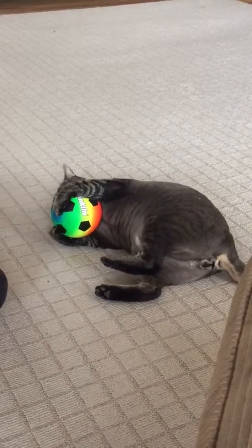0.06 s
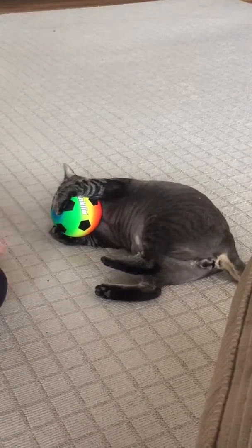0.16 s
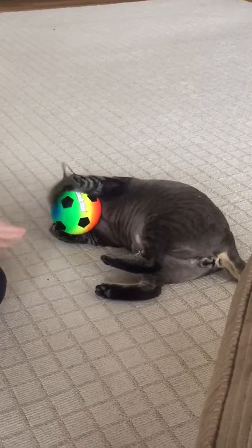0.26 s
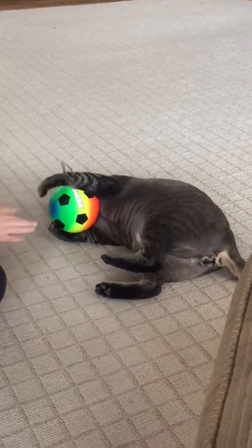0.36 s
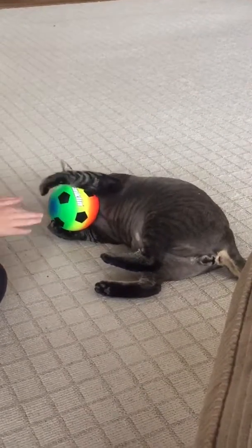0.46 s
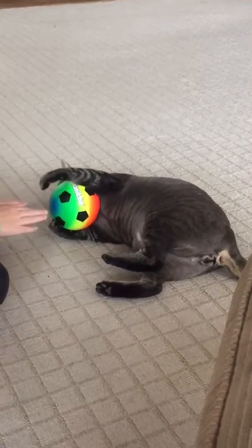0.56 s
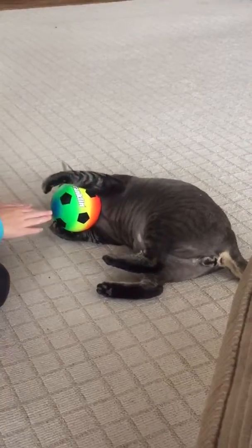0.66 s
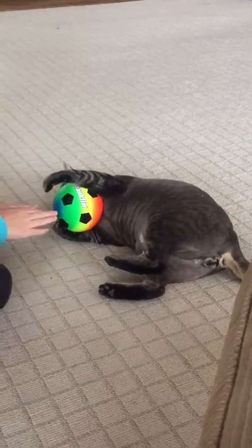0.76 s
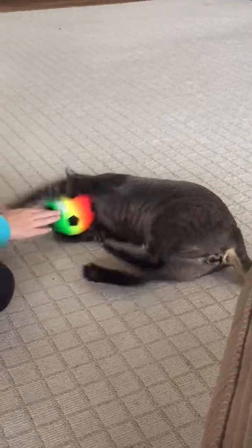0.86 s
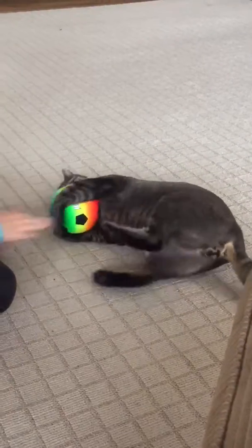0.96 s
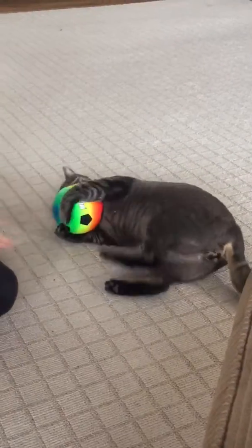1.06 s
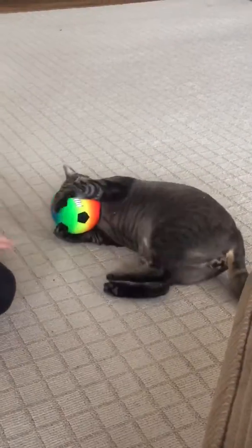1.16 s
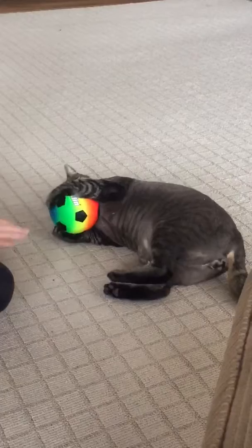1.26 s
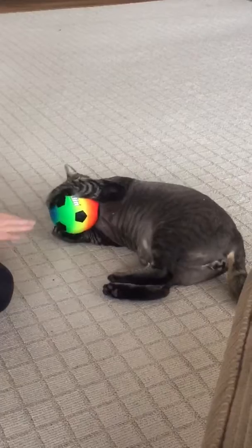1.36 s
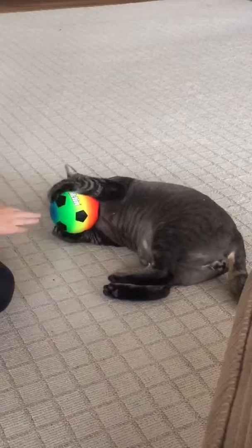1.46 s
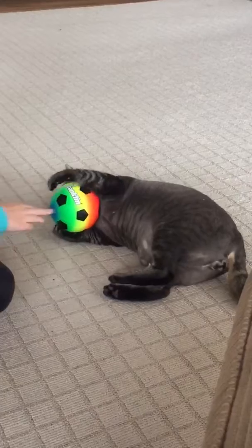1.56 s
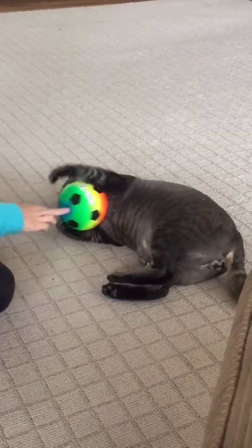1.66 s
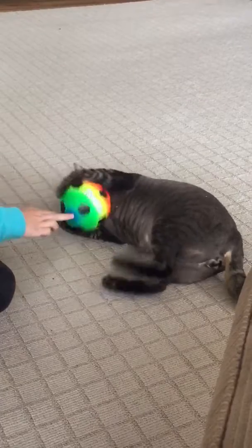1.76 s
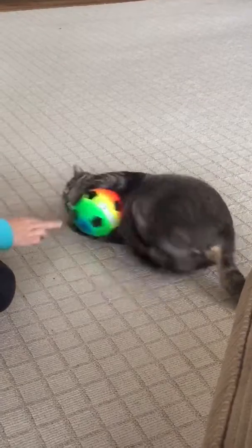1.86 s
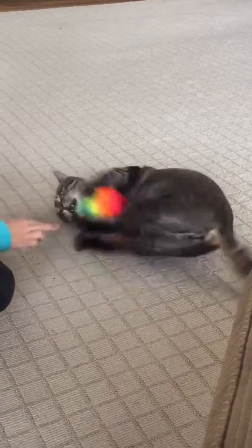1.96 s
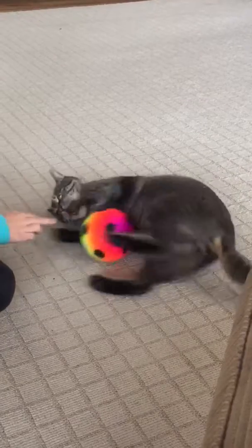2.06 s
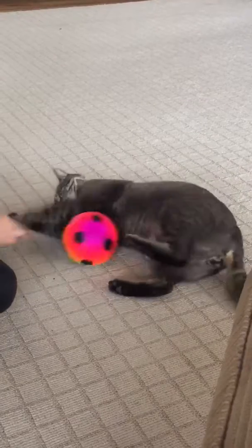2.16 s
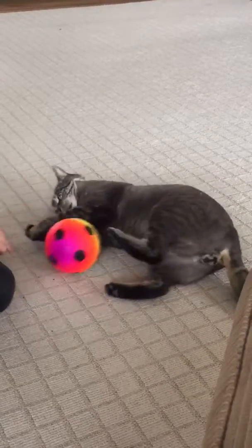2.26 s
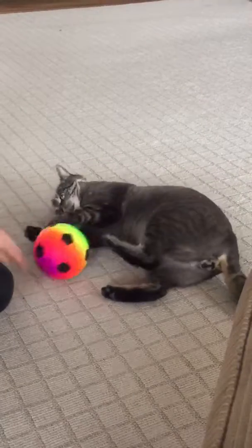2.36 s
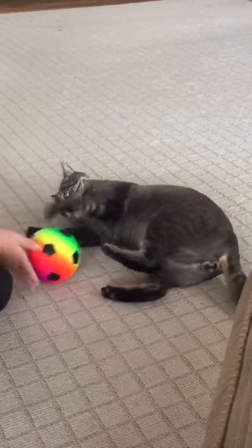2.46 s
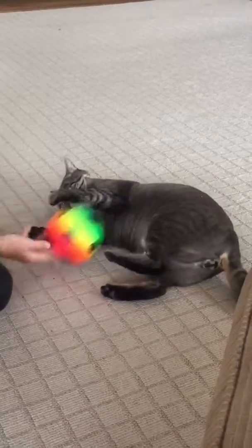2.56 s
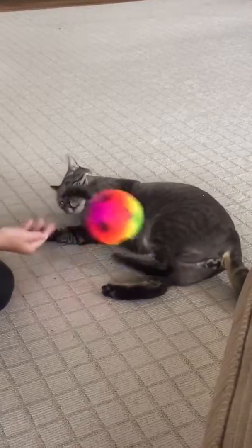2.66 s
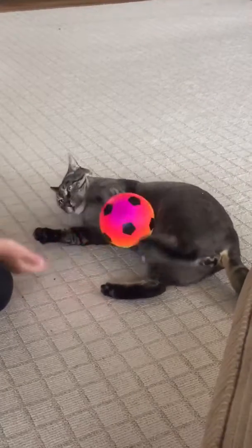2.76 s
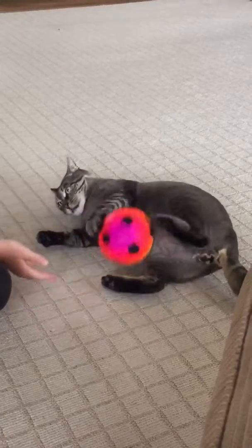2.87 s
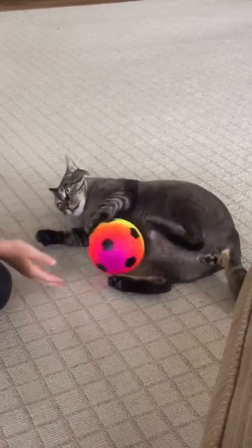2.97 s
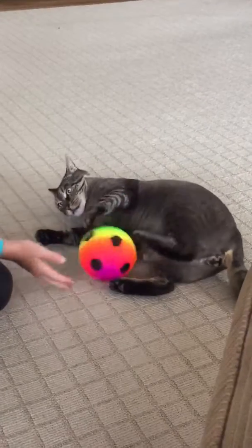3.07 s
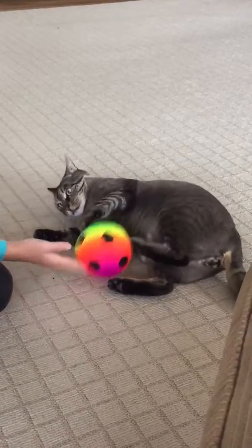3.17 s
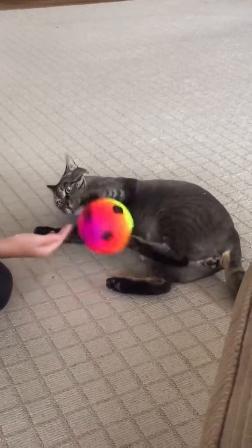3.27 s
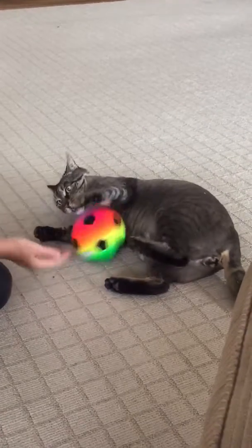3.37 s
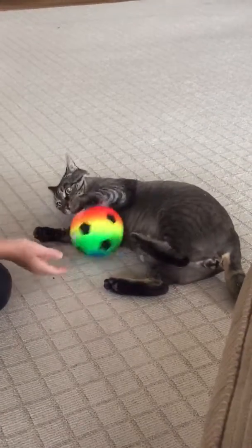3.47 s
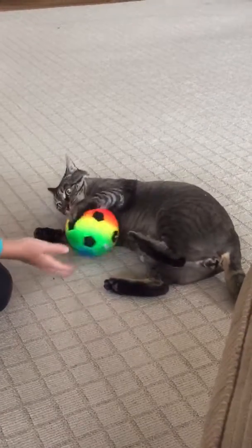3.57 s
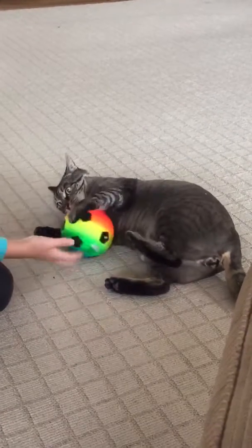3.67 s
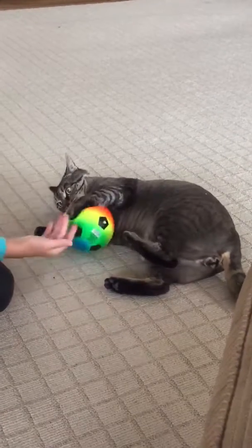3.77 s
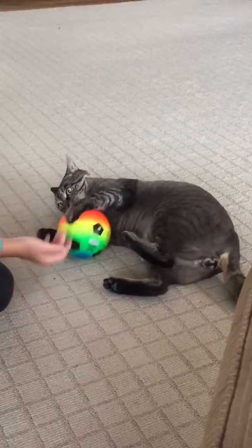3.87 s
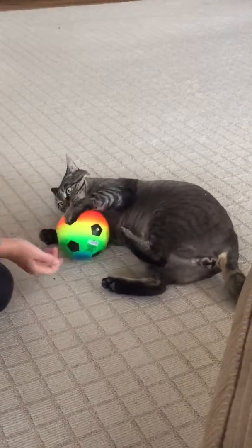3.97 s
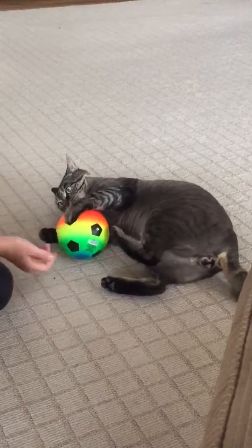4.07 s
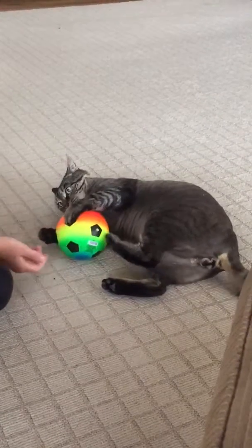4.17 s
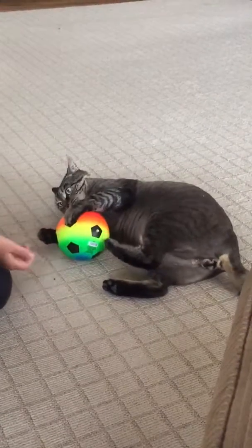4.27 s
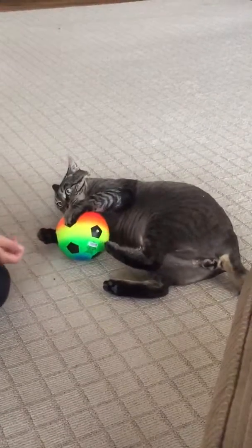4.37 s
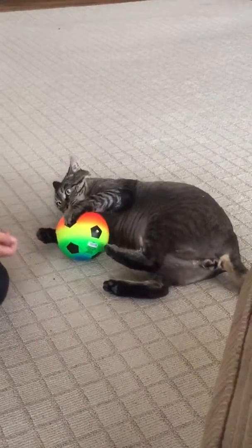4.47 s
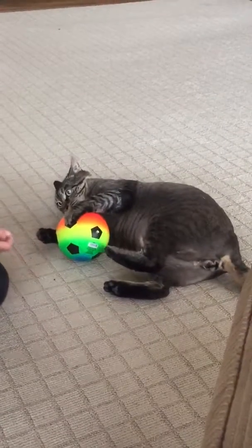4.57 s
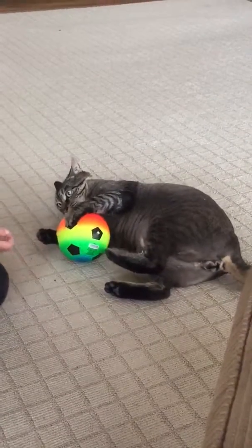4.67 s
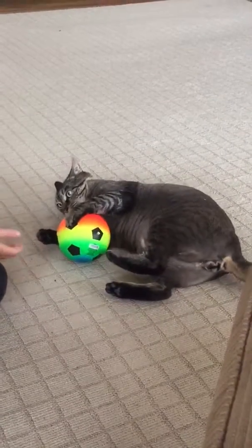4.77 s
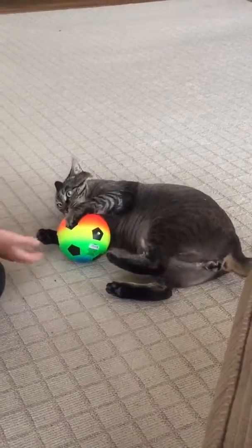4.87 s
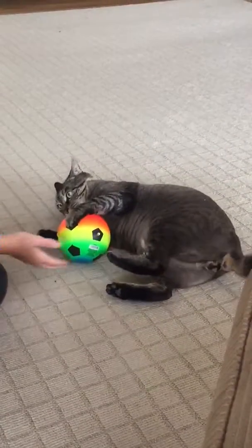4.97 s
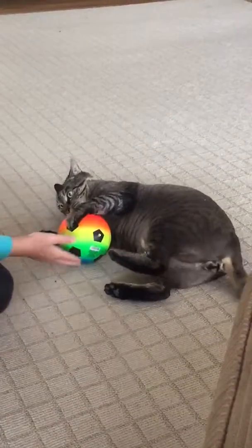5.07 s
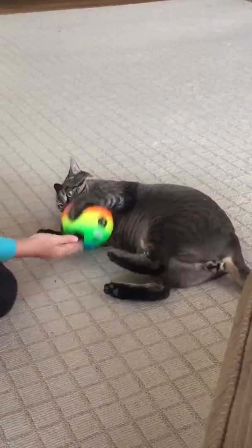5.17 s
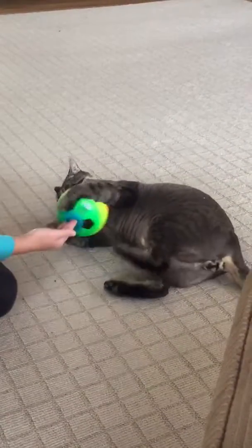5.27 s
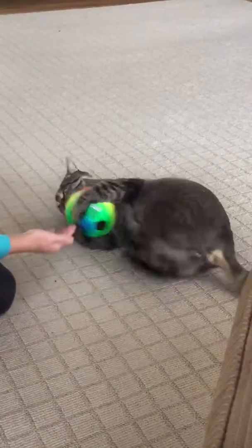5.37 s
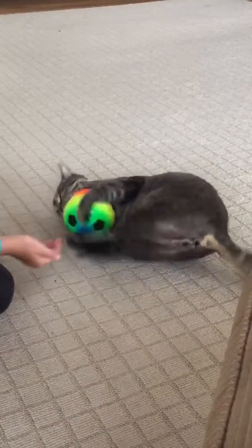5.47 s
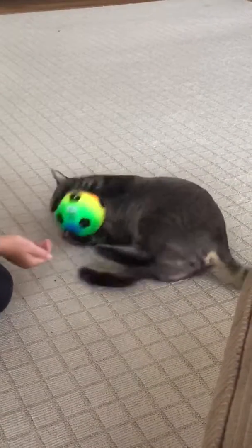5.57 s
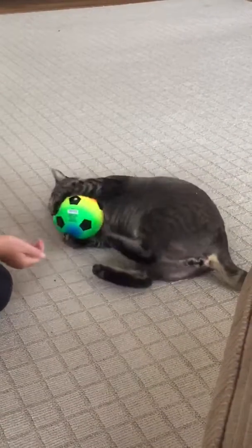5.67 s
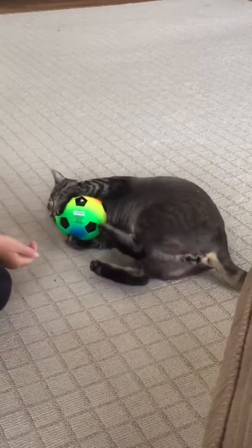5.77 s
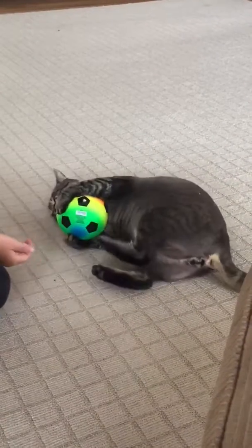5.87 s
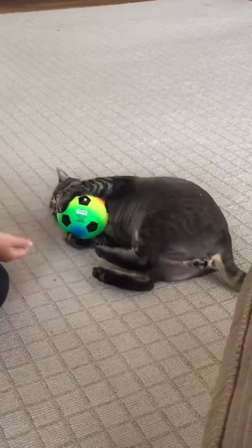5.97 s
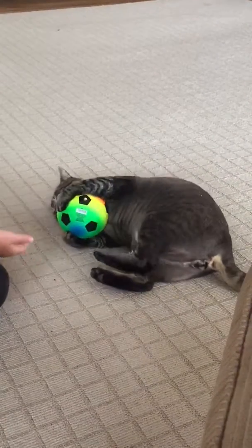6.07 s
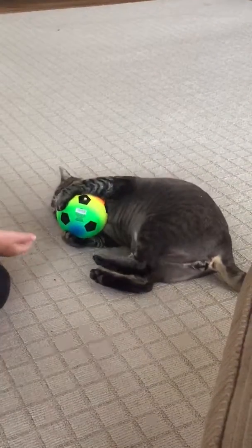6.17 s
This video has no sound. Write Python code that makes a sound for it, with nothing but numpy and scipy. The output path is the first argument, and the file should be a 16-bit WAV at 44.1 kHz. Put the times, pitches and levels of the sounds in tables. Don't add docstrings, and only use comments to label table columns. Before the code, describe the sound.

In a quiet carpeted living room, a cat growls low and rattling, its pitch climbing, then breaks into a short hoarse snarl. After a pause comes a double snarl with hollow ball thumps and scuffs, then a low snarl leading into a long yowl that rises, sags and dies. A last short snarl comes with more thumps. The microphone is a little way off, with slight room echo and faint low hum.

```python
import sys
import numpy as np
from scipy import signal
from scipy.fft import rfft, irfft, next_fast_len
from scipy.io import wavfile
from scipy.ndimage import uniform_filter1d

SR = 44100
rng = np.random.default_rng(int(sys.argv[2]) if len(sys.argv) > 2 else 0)


def persist_wave(psi):
    counts = np.round(np.clip(psi, -1, 1) * 32767).astype(np.int16)
    wavfile.write(sys.argv[1], SR, np.atleast_2d(counts).T)


def ratio_of_db(decibels):
    return 10 ** (np.asarray(decibels, float) / 20)


N = 274302
TIME = np.arange(N) / SR


def rms_one(x):
    return x / np.sqrt(np.mean(x ** 2) + 1e-20)


def evened(x):
    return x / np.sqrt(uniform_filter1d(x ** 2, size=1800) + 1e-12)


def drift(rate_hz):
    r = np.exp(-2 * np.pi * rate_hz / SR)
    wander = signal.lfilter([1], [1, -2 * r, r * r], rng.standard_normal(N + SR))
    return rms_one(wander[SR:])


def coloured(spectrum):
    hz, level_db = np.transpose(spectrum)
    size = next_fast_len(N)
    bins_hz = np.arange(size // 2 + 1) * SR / size + 1
    gain = ratio_of_db(np.interp(np.log(bins_hz), np.log(hz), level_db))
    return rms_one(irfft(rfft(rng.standard_normal(size)) * gain, size)[:N])


def butter(x, hz, kind, order):
    return signal.sosfilt(signal.butter(order, hz, kind, fs=SR, output="sos"), x)


def resonance(x, hz, width_hz):
    r = np.exp(-np.pi * width_hz / SR)
    poles = [1, -2 * r * np.cos(2 * np.pi * hz / SR), r * r]
    return signal.lfilter([(1 - r * r) / 2, 0, (r * r - 1) / 2], poles, x)


def twice_resonant(x, hz, width_hz):
    return resonance(resonance(x, hz, width_hz), hz, width_hz)


def ring(db, hz, t60_s):
    age = TIME[:SR // 5]
    landing = 1 - np.exp(-age / 0.00054)
    return ratio_of_db(db - 60 * age / t60_s) * np.sin(2 * np.pi * hz * age) * landing


def add(out, at_s, sound):
    i = round(at_s * SR)
    out[i:i + len(sound)] += sound


def swells(rows):
    return sum(ratio_of_db(db) * np.exp(-(2.6 * (TIME - s) / length_s) ** 4) for s, db, length_s in rows)


def played(tables):
    s, *columns = np.transpose(sorted(row for table in tables for row in table))
    return [np.interp(TIME, s, column) for column in columns]


def sounding(tables, fade_s):
    gate = 0
    for table in tables:
        start_s, end_s = table[0][0], table[-1][0]
        since_start = TIME - start_s + (start_s == 0)
        gate = gate + np.clip(np.minimum(since_start, end_s - TIME) / fade_s, 0, 1)
    return gate


def house():
    # (frequency [Hz], density [dB/Hz])
    hum_colour = [(12, -90), (20, -59), (49, -9.5), (106, -3), (129, -3.5), (149, -9.5), (196, -10.5),
                  (343, -21), (428, -26), (466, -23.5), (688, -30.5), (748, -40.5), (1020, -37.5),
                  (3010, -41.5), (15600, -51)]
    # (frequency [Hz], width [Hz], level [dB])
    drone_bands = [(68.5, 8.3, -60.5), (117.1, 7.6, -59.5)]
    out = ratio_of_db(-57) * coloured(hum_colour)
    for hz, width_hz, db in drone_bands:
        drone = rms_one(resonance(rng.standard_normal(N), hz, width_hz))
        out = out + ratio_of_db(db + 3.06 * drift(4.6)) * drone
    return out


def room(x):
    t60_s, wall_cut_hz = 0.63, 6400
    size = next_fast_len(N + SR)
    turn = np.exp(-2j * np.pi * np.arange(size // 2 + 1) / size)
    dull = np.exp(-2 * np.pi * wall_cut_hz / SR)
    lags = np.geomspace(.011, .043, 10) * rng.uniform(0.92, 1.05, 10) * SR
    tail = 0
    for k, lag in enumerate(lags):
        loss = ratio_of_db(-60 * lag / SR / t60_s)
        loop = loss * (1 - dull) / (1 - dull * turn) * turn ** int(lag)
        tail = tail + (-1) ** k * loop / (1 - loop)
    return irfft(rfft(x, size) * tail, size)[:N]


def scuffs():
    # (frequency [Hz], density [dB/Hz])
    carpet_colour = [(1470, -19), (2500, -9.5), (3810, -16), (5420, -13.5), (6460, -17), (7700, -23.5),
                     (8640, -21.5), (10600, -27), (13500, -18.5), (15600, -27)]
    # (middle [s], level [dB], length [s])
    scuff_rows = [(0.45, -85.5, 0.22), (1.2, -77.5, 0.14), (2.01, -74, .24), (2.0, -64, 0.057),
                  (2.05, -83, .05), (2.33, -80, .27), (2.64, -81.5, .06), (2.96, -79, .08),
                  (3.245, -78, 0.084), (4.43, -84.5, 0.35), (5.04, -84, 0.14), (5.543, -64.5, .055),
                  (5.8, -84.5, .15)]
    # (middle [s], level [dB], length [s])
    rumble_rows = [
        (1.2, -57, 0.17),
        (2.05, -41, 0.27),
        (2.3, -58, .2),
        (3.02, -54, 0.18),
        (4.55, -54, 0.3),
        (5.62, -48, 0.19),
    ]
    hiss = coloured(carpet_colour) * ratio_of_db(3.05 * drift(60) + 5.5)
    rumble = rms_one(resonance(rng.standard_normal(N), 91, 37)) * ratio_of_db(-7.5)
    return swells(scuff_rows) * hiss + swells(rumble_rows) * rumble


def noise_swells():
    # (middle [s], level [dB], frequency [Hz], width [Hz], length [s])
    noise_rows = [(1.872, -69, 2200, 1560, 0.011), (1.907, -52, 275, 110, 0.098),
                  (2.961, -51, 315, 250, 0.16), (5.533, -49, 525, 240, 0.035),
                  (5.53, -54.5, 2700, 410, 0.053), (2.175, -68.5, 5650, 480, 0.04),
                  (2.352, -60, 2230, 570, 0.02), (2.352, -65.5, 747, 216, .03),
                  (2.638, -72.5, 2060, 980, 0.037), (2.968, -76, 9370, 500, 0.049),
                  (5.218, -69, 1600, 1400, 0.035), (1.99, -62, 13100, 1500, .05),
                  (1.996, -64, 7470, 440, 0.063)]
    out = np.zeros(N)
    age = TIME[:SR // 5] - .1
    for s, db, hz, width_hz, length_s in noise_rows:
        noise = rms_one(twice_resonant(rng.standard_normal(len(age)), hz, width_hz))
        add(out, s + age[0], ratio_of_db(db) * noise * np.exp(-(2.7 * age / length_s) ** 2))
    return out


def blows():
    # (time [s], peak [dB], ball ring [Hz])
    thump_rows = [(1.087, -44.5, 543), (1.869, -41, 370), (2.001, -29, 435.2), (2.044, -32, 429),
                  (2.059, -35.5, 402), (2.094, -27, 435), (2.631, -45, 423), (2.735, -51, 510),
                  (2.868, -45.5, 430), (3.272, -40.5, 424), (3.513, -38.5, 415), (4.469, -44.5, 366),
                  (5.522, -32, 348.7), (5.554, -29.5, 360), (5.588, -40, 380), (5.6, -36, 432)]
    # (time [s], peak [dB], frequency [Hz], t60 [s])
    knee_rows = [
        (5.208, -37, 141, 0.046),
    ]
    out = np.zeros(N)
    for s, db, hz in thump_rows:
        air = ring(db + 2.5, hz, 0.038)
        overtone = ring(db - 18.5, 1.606 * hz, 0.045)
        floor = ring(db - 16, 90, 0.13)
        add(out, s, air + overtone + floor)
    for s, db, hz, t60_s in knee_rows:
        add(out, s, ring(db, hz, t60_s))
    return out


def folds(pitch_hz, rough):
    wobble = .012 * drift(25) + .09 * rough * drift(70)
    cycles = np.cumsum(pitch_hz * (1 + wobble)) / SR
    harmonics = np.floor(7000 / pitch_hz)
    pulse = np.sin((2 * harmonics + 1) * np.pi * cycles) / np.sin(np.pi * cycles)
    puffs = (1 - pulse) / np.sqrt(2 * harmonics)
    cycle_number = np.round(cycles).astype(int)
    strength = ratio_of_db(5 * rough * rng.standard_normal(N)[cycle_number])
    breath = rng.standard_normal(N) * (1 + np.cos(2 * np.pi * cycles)) * 1.4
    return (puffs * np.sqrt(1 - rough ** 2) + rough * breath) * strength


def throat(x, modes):
    out = 0
    for k, (hz, width_hz, db) in enumerate(modes):
        out = out + (-1) ** k * ratio_of_db(db) * twice_resonant(x, hz, 1.4 * width_hz)
    return evened(out)


def mouth(x, hz, width_hz, size=128):
    r = np.exp(-np.pi * 1.55 * np.broadcast_to(width_hz, N) / SR)
    y = np.zeros(N)
    state = np.zeros(4)
    for i in range(0, N, size):
        poles = [1, -2 * r[i] * np.cos(2 * np.pi * hz[i] / SR), r[i] ** 2]
        y[i:i + size], state = signal.lfilter([1, 0, -1], np.convolve(poles, poles), x[i:i + size], zi=state)
    return evened(y)


def growl():
    # (time [s], pitch [Hz], throat level [dB])
    growl_path = [
        (0.0, 114.3, -64),
        (0.2, 115.9, -66),
        (0.38, 117.8, -60.5),
        (0.47, 139.6, -56.5),
        (0.6, 168.5, -56),
        (0.69, 183, -57),
        (0.8, 177.7, -55),
        (0.9, 174.9, -57),
        (0.94, 174.6, -50),
    ]
    # (frequency [Hz], width [Hz], level [dB])
    shut_throat = [(355, 125, 0.1), (715, 120, -4)]
    pitch_hz, throat_db = played([growl_path])
    slack_tight_hz = [150, 180]
    rough = np.interp(pitch_hz, slack_tight_hz, [.62, .44])
    chest_db = np.interp(pitch_hz, slack_tight_hz, [5, 1])
    source = folds(pitch_hz, rough)
    chest = ratio_of_db(chest_db) * mouth(source, pitch_hz, 75)
    leak = ratio_of_db(-24) * throat(source, [(1240, 200, 0)])
    voice = throat(source, shut_throat) + chest + leak
    return ratio_of_db(throat_db) * sounding([growl_path], 0.0091) * voice


def cries(calls, mouths, roughs, widths_hz, gape_lift, strained):
    # (frequency [Hz], width [Hz], level [dB])
    open_throat = [(694, 108, 0.1)]
    first_width_hz, second_width_hz, teeth_widths_hz = widths_hz
    tables = []
    for call, shape, rough, teeth_width_hz in zip(calls, mouths, roughs, teeth_widths_hz):
        tables.append([(*row, *shape, rough, teeth_width_hz) for row in call])
    (pitch_hz, throat_db, jaw, lips, first_hz, second_hz, teeth_hz, teeth_db,
     lift, rough, teeth_width_hz) = played(tables)

    lips_rise = lift * lips
    gape_rise = gape_lift * np.clip(jaw - .64, 0, 1)
    if strained:
        rough = rough + .75 * np.clip(jaw - .7, 0, 1) + .0022 * np.clip(350 - pitch_hz, 0, None)
        teeth_db = teeth_db + 14 * jaw
        teeth_rise = 0.19 * gape_rise
    else:
        teeth_db = teeth_db + 21.5 * lips
        teeth_rise = 0.67 * lips_rise + 0.19 * gape_rise
    first_db = -30 + 40 * jaw
    second_db = first_db - 25.5 + 35 * lips

    source = folds(pitch_hz, rough)
    muffled = butter(source, 2700, "low", order=6)
    chest = ratio_of_db(-3) * mouth(muffled, pitch_hz, 78)
    low = evened(throat(muffled, open_throat) + chest)
    first = mouth(muffled, first_hz * (1 + lips_rise), first_width_hz)
    first = ratio_of_db(first_db + 2.5 * drift(9.8)) * first
    second = mouth(muffled, second_hz * (1 + 0.26 * lips_rise + gape_rise), second_width_hz)
    second = ratio_of_db(second_db + 2.5 * drift(10.7)) * second
    sharp = butter(source, 2300, "high", order=4)
    teeth = ratio_of_db(first_db + teeth_db) * mouth(sharp, teeth_hz * (1 + teeth_rise), teeth_width_hz)
    return ratio_of_db(throat_db) * sounding(calls, 0.028) * (low - first + second + teeth)


def yowl():
    # (time [s], pitch [Hz], throat level [dB], jaw opening [0-1], lips drawn back [0-1])
    yowl_path = [
        (3.04, 267.9, -62.5, .12, 1),
        (3.335, 335, -51.5, .12, .65),
        (3.385, 363, -47, .72, .25),
        (3.47, 409, -54, .97, .5),
        (3.67, 404, -52, .76, .38),
        (3.85, 395.7, -55, .52, .85),
        (4.13, 374, -45.5, 0.39, 0.52),
        (4.29, 328.3, -52, 0.38, 0.48),
        (4.53, 200, -69, 0.22, .6),
    ]
    # (first cavity [Hz], second cavity [Hz], teeth ring [Hz], teeth level [dB], cavity rise by lips [0-1])
    yowl_mouth = (1090, 1871, 5228, -35.5, 0.35)
    # (first cavity width [Hz], second cavity width [Hz], teeth ring width per call [Hz])
    yowl_widths_hz = (300, 235, [270])
    return cries([yowl_path], [yowl_mouth], [.13], yowl_widths_hz, gape_lift=.9, strained=True)


def snarls():
    # (time [s], pitch [Hz], throat level [dB], jaw opening [0-1], lips drawn back [0-1])
    snarl_paths = [
        [(0.92, 361.7, -61, .05, .3), (0.945, 359.3, -45, 0.23, 0.23), (0.97, 349.9, -47, .84, 0.17),
         (1.03, 408, -48, .66, .6), (1.1, 401.3, -63, .88, .65), (1.145, 408, -67, 1.0, .5)],
        [(1.85, 323, -58, .12, 0.5), (1.898, 347.5, -48.5, .2, 0.64), (1.915, 336.8, -49.5, .68, .62),
         (1.96, 349.1, -42, .55, .6), (1.997, 397.4, -48, .45, 1.08), (2.06, 396.2, -65.5, 0.43, 1),
         (2.17, 345.2, -54, 0.22, 0.9), (2.21, 330, -61, 0.42, .85)],
        [(2.9, 219.2, -61, .45, 0.6), (2.93, 231.2, -48, 0.54, .35), (2.965, 229.8, -50, 0.69, .74),
         (3.0, 245, -61, 0.59, 0.38), (3.04, 268, -63, .3, .5)],
        [(5.48, 334, -52, 0.76, 0.28), (5.496, 323.9, -56.5, 0.81, 0), (5.52, 336.8, -41.5, 0.59, 0.57),
         (5.548, 331.3, -51.5, 0.52, .77), (5.585, 345, -64, 0.68, 0.2)],
    ]
    # (first cavity [Hz], second cavity [Hz], teeth ring [Hz], teeth level [dB], cavity rise by lips [0-1])
    snarl_mouths = [(1070, 1830, 3500, -34, 0.63), (1230, 2080, 4650, -21.5, 0.2),
                    (1200, 2190, 4200, -23.5, .3), (1290, 2000, 4900, -21, .16)]
    # (first cavity width [Hz], second cavity width [Hz], teeth ring width per call [Hz])
    snarl_widths_hz = (360, 520, [380, 849.4, 650, 900])
    snarl_rough = [.46, .55, .55, .2]
    return cries(snarl_paths, snarl_mouths, snarl_rough, snarl_widths_hz, gape_lift=0.054, strained=False)


def scene():
    near = scuffs() + noise_swells() + blows() + growl() + yowl() + snarls()
    walls = room(butter(near, 690, "high", order=1))
    return (house() + ratio_of_db(-16.5) * walls + near)[None]


def top_cut(x):
    return signal.sosfilt(signal.butter(12, 15720, fs=SR, output="sos"), x)


def record(dry):
    return top_cut(dry)


dry = scene()
out = record(dry)
persist_wave(out)
```